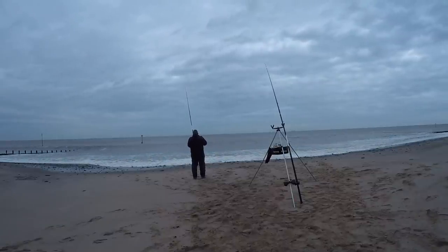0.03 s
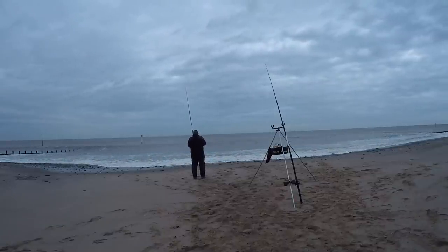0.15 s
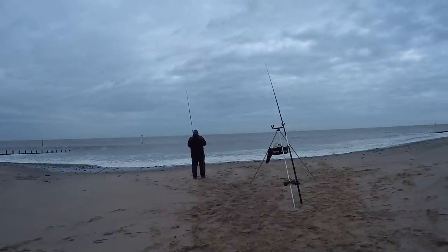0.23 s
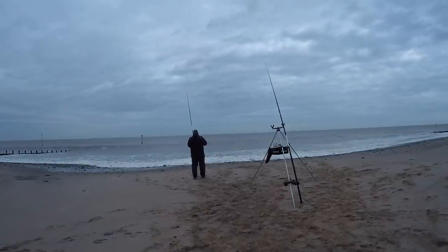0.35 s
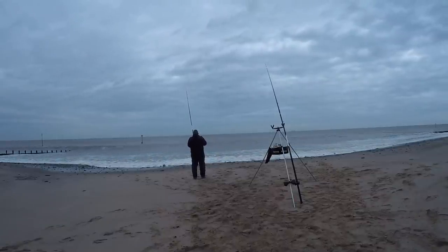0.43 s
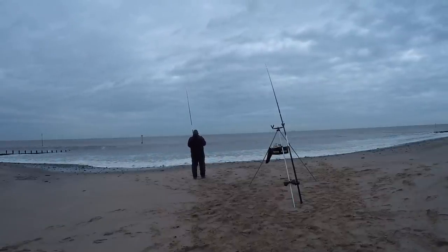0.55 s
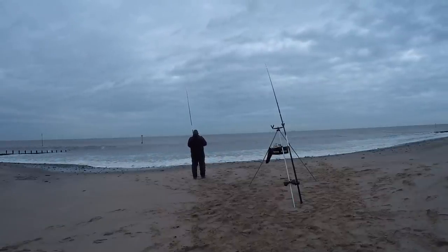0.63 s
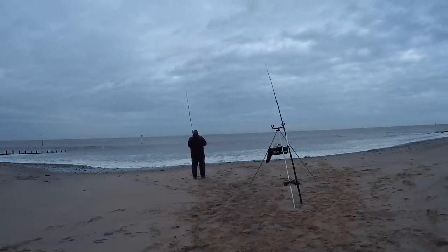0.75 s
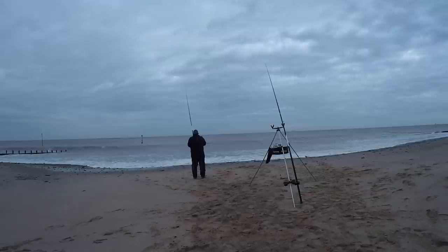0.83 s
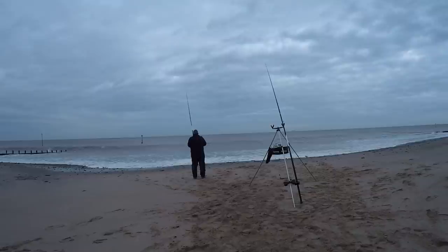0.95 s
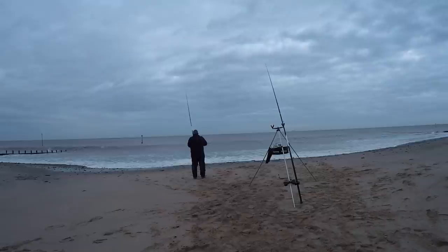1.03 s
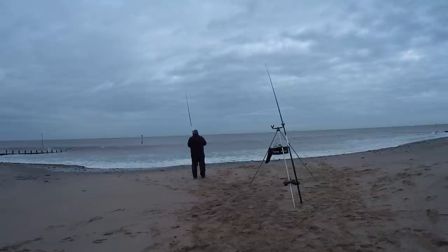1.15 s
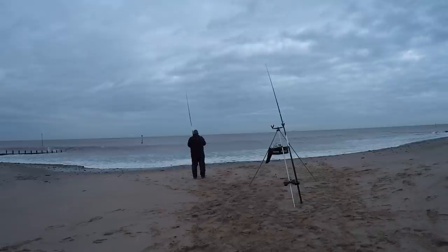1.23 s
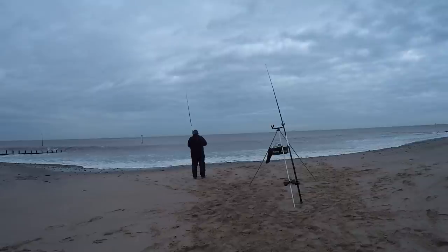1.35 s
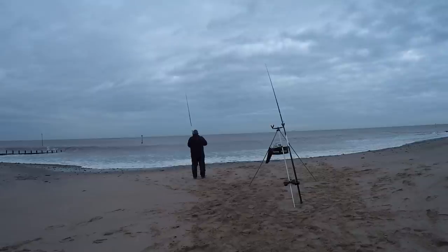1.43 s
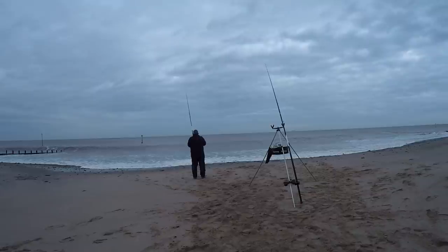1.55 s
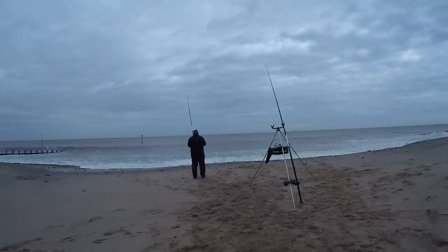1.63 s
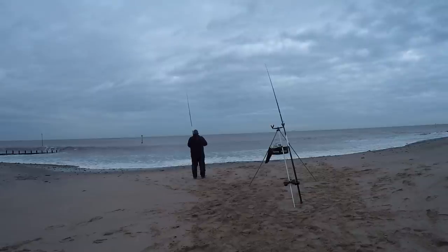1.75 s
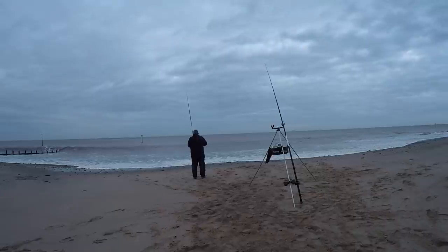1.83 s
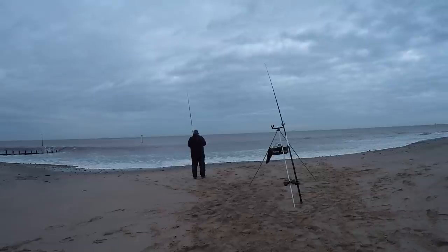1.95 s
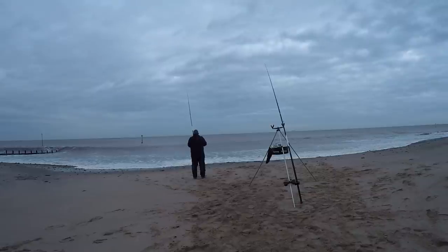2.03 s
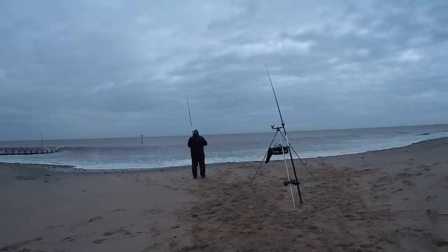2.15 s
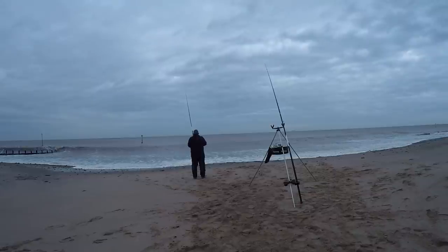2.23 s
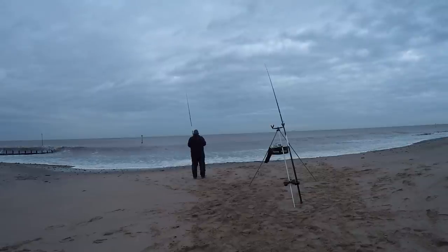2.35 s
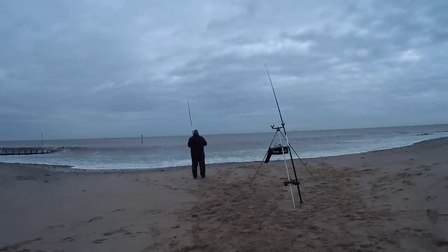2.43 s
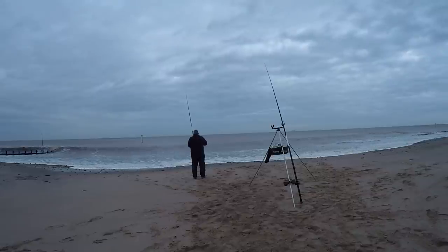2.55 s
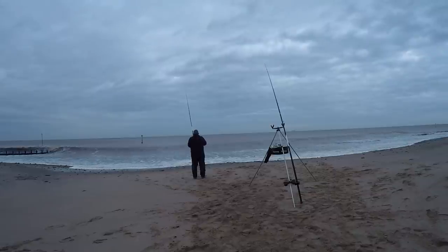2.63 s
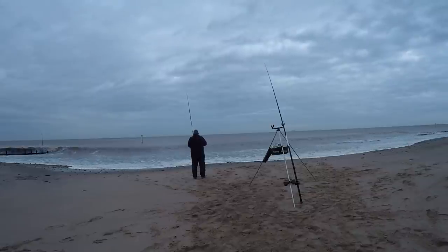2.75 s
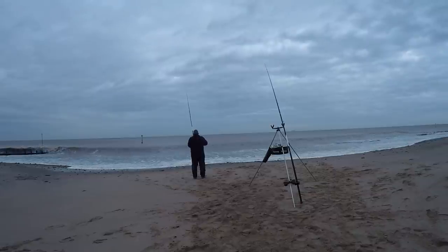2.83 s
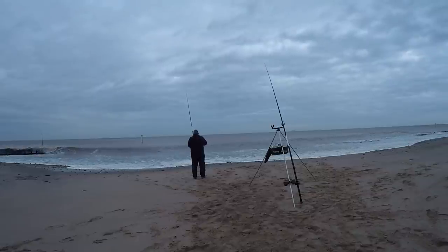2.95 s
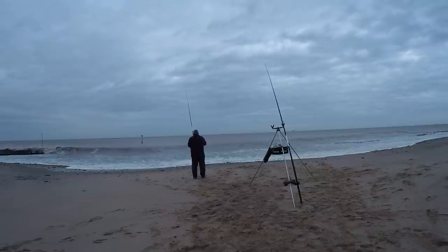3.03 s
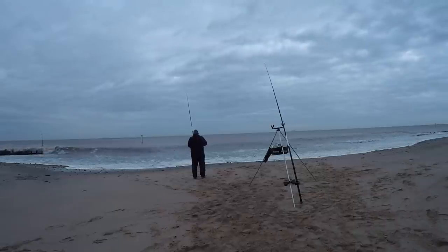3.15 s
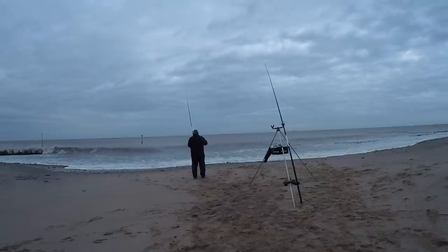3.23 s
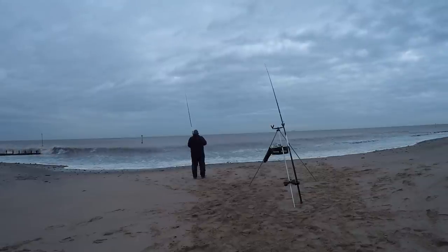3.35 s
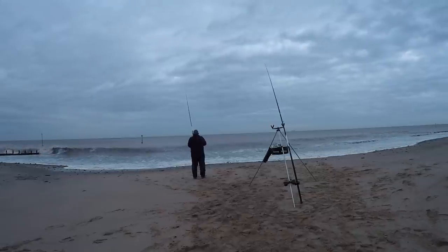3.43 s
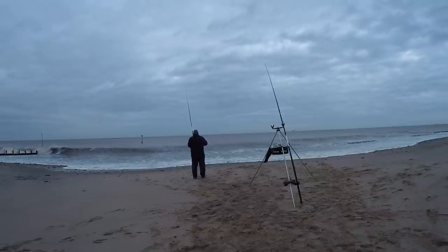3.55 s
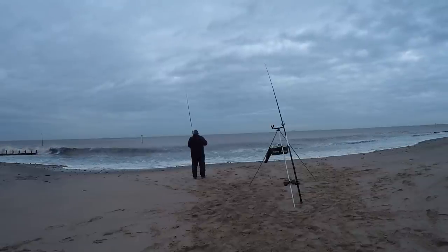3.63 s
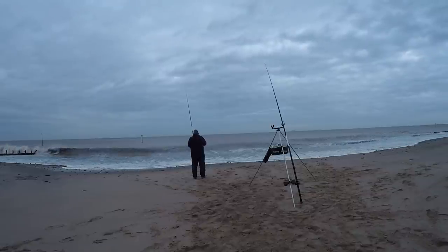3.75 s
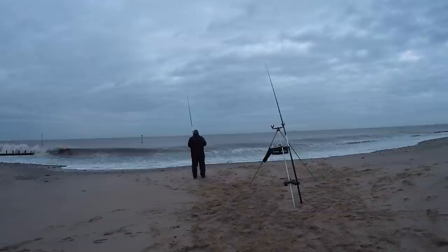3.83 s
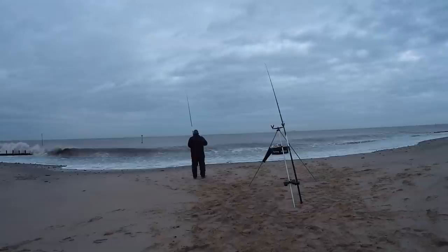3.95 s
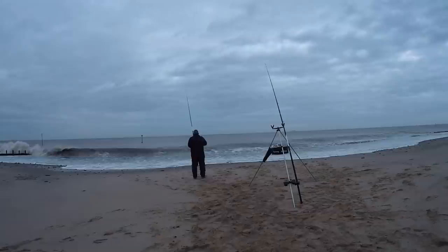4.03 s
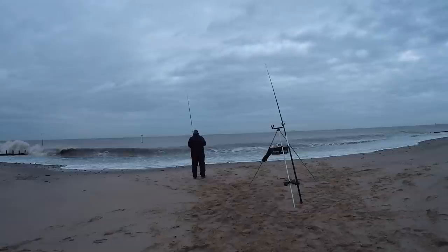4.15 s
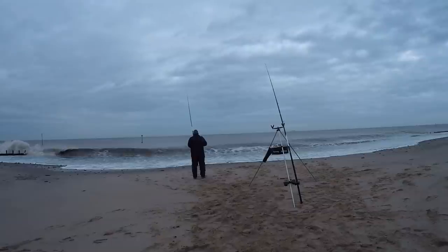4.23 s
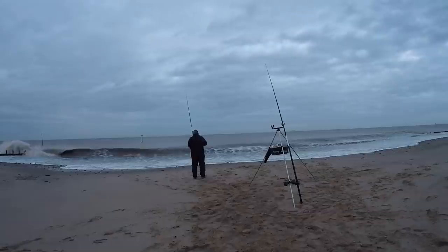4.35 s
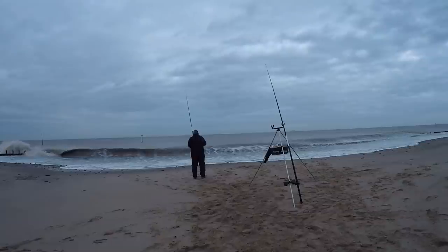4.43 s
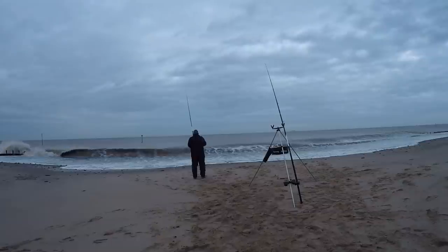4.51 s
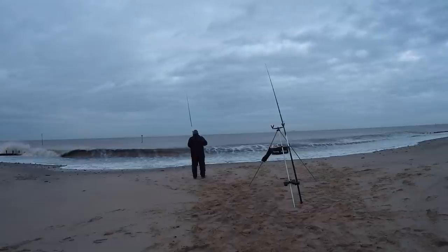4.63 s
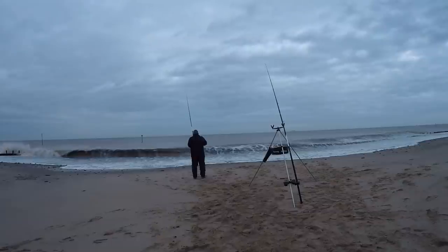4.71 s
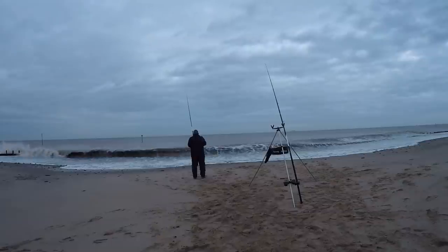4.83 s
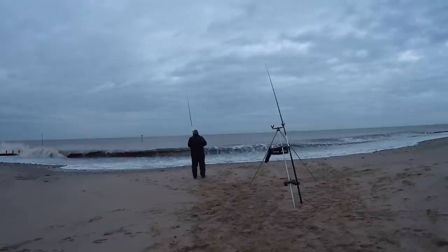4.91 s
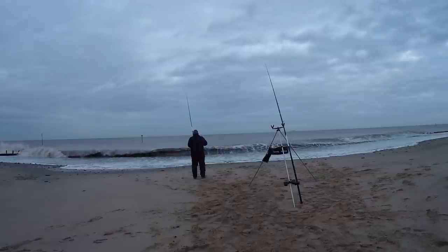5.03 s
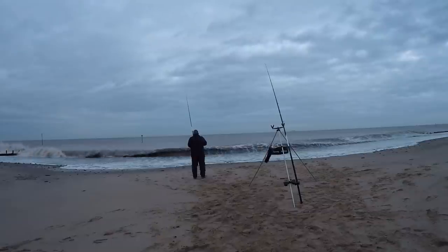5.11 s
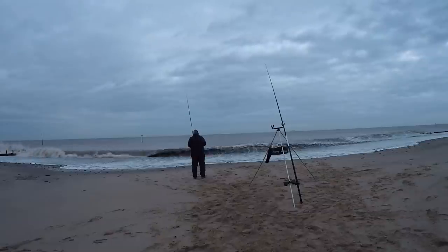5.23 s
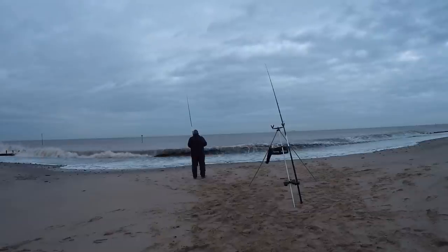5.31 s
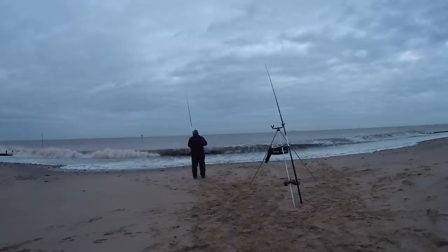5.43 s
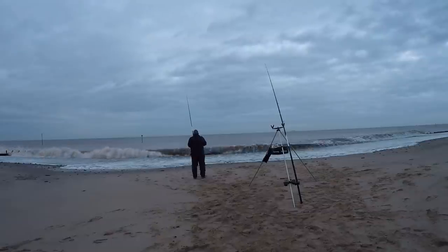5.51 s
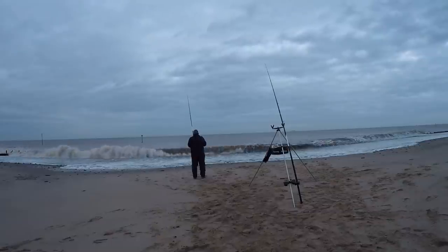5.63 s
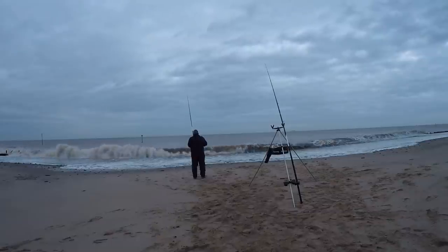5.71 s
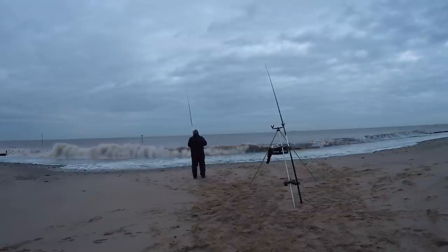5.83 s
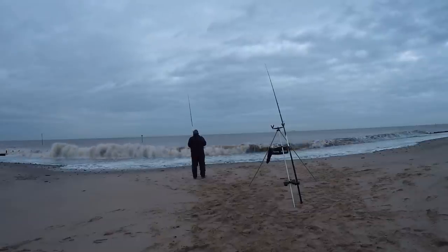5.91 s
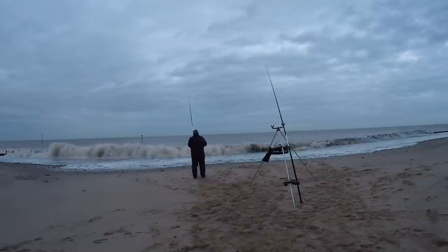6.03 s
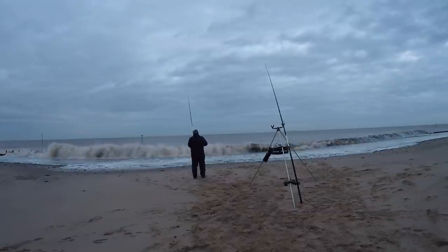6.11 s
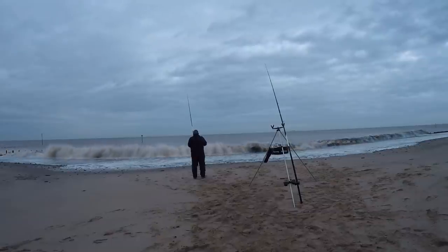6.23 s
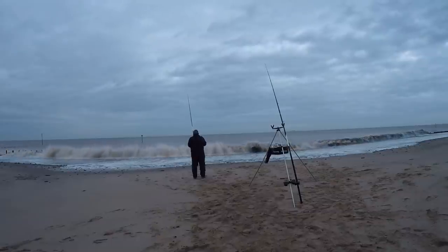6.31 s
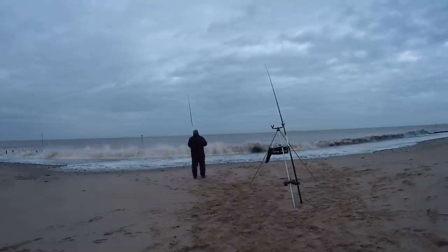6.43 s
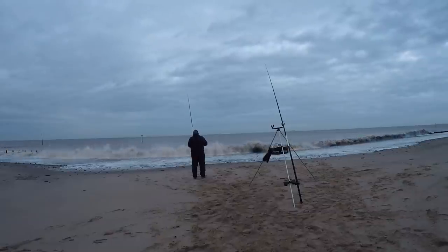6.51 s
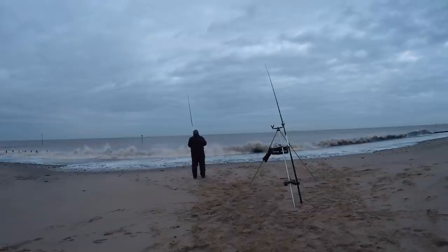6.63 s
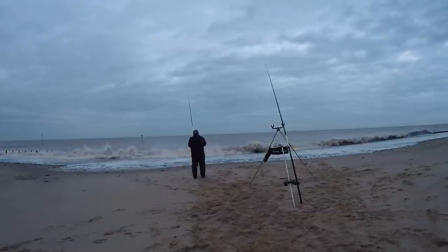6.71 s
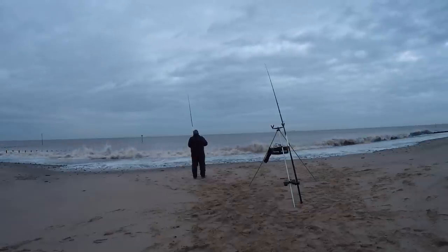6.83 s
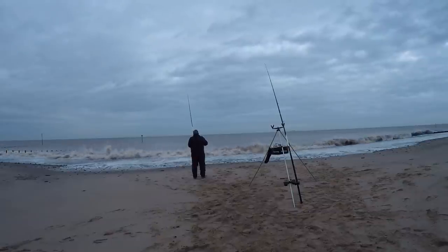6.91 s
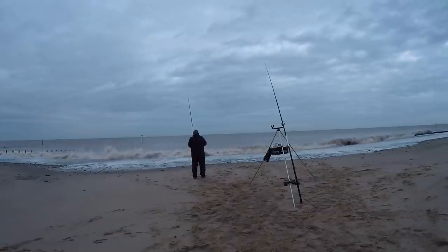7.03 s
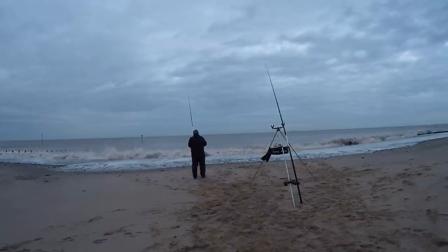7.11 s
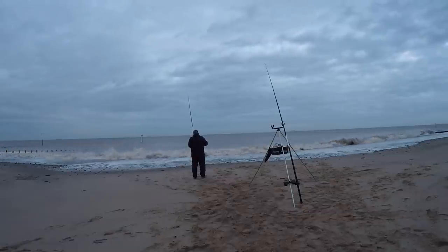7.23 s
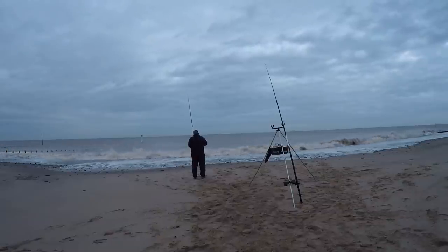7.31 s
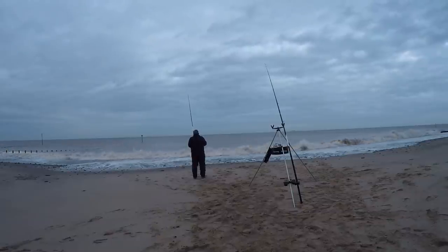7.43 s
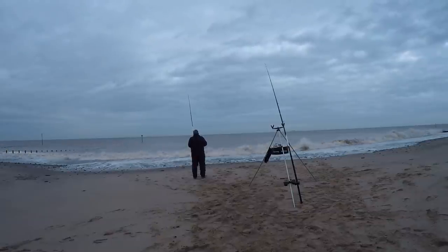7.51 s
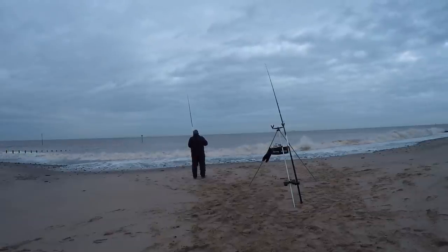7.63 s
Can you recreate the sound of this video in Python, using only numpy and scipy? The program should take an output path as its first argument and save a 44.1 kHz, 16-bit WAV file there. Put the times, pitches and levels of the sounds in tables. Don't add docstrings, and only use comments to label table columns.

```python
import sys
import numpy as np
from scipy import signal
from scipy.fft import rfft, irfft, next_fast_len
from scipy.io import wavfile
from scipy.ndimage import uniform_filter1d

SR = 44100
rng = np.random.default_rng(int(sys.argv[2]) if len(sys.argv) > 2 else 0)


def attenuation_scalar(level_db):
    decades = np.asarray(level_db, float) / 20
    return 10 ** decades


def bounce(signal):
    frames = np.transpose(np.atleast_2d(signal))
    limited = np.clip(frames, -1, 1)
    pcm = np.round(limited * 32767).astype(np.int16)
    wavfile.write(sys.argv[1], SR, pcm)


N = 338247
TIME = np.arange(N) / SR
TICKS = np.arange(0, N / SR + .01, 1 / 500)
SIZE = next_fast_len(N)
OCTAVES = np.log2(np.maximum(np.arange(SIZE // 2 + 1), 1) * SR / SIZE)


def along(table, hz):
    table_hz, value = np.transpose(table)
    return np.interp(np.log(hz), np.log(table_hz), value)


def curves(table):
    s, *columns = np.transpose(table)
    return [np.interp(TIME, s, column) for column in columns]


def smooth(x):
    return np.interp(TIME, TICKS, x)


def unit(x):
    return x / np.sqrt(np.mean(x ** 2))


def together(*levels_db):
    return 10 * np.log10(sum(attenuation_scalar(db) ** 2 for db in levels_db))


def walk(rate):
    knots = np.arange(0, N / SR + 2 / rate, 1 / rate)
    joined = np.interp(TICKS, knots, rng.standard_normal(len(knots)))
    return smooth(uniform_filter1d(joined, max(int(250 / rate), 1)))


def bursts(size_db):
    noise = rng.standard_normal((2, SIZE))
    return noise * attenuation_scalar(size_db * rng.exponential(size=(2, SIZE)))


# frequency in Hz, apart part against shared part in dB.
PORT_DIFFERENCE = [(10, -13), (100, -31), (700, -21.5), (1800, -27), (3000, -14.5), (4300, -14.5),
                   (6000, -7), (8000, -2), (9500, 0.5), (14000, 1)]


def cloud(colour, size_db, surge_db, surge_rate, flicker_db, flicker_rate,
          tilt_db=0., pivot_hz=1000, reach=np.inf, even=0):
    hz, step = 2 ** OCTAVES, 2 / 3
    shared_db = along(colour, hz)
    spectrum = rfft(bursts(size_db)) * attenuation_scalar([shared_db, shared_db + along(PORT_DIFFERENCE, hz)])
    out, surge = 0, surge_db * walk(surge_rate)
    for centre in np.arange(np.log2(colour[0][0]), np.log2(colour[-1][0]), step):
        band = np.clip(1 - abs(OCTAVES - centre) / step, 0, 1)
        part = irfft(spectrum * band, SIZE)[:, :N]
        if even:
            power = uniform_filter1d(part[0] ** 2, size=SR // 5) / np.mean(part[0] ** 2)
            part = part / (np.abs(power) + .01) ** (even / 2)
        height = centre - np.log2(pivot_hz)
        tilt = tilt_db * min(height, 2 * reach - height)
        out = out + part * attenuation_scalar(surge + flicker_db * walk(flicker_rate) + tilt)
    return out / np.sqrt(np.mean(out[0] ** 2))


# frequency in Hz, density in dB.
BOOM_COLOUR = [(40, -3), (80, 1.5), (140, 0.5), (280, -3), (500, -7), (800, -12), (1200, -29),
               (2000, -33.5)]
CHURN_COLOUR = [(300, -15), (600, 6.5), (1000, 10.5), (1400, 8), (1900, 4), (2400, -2), (3500, -8),
                (6000, -17)]
FOAM_COLOUR = [(1200, 3), (2400, 8), (3200, 5.5), (4200, 8), (5500, 5), (7500, -4.5), (9000, -6.5),
               (11000, -31)]
MIST_COLOUR = [(6000, -12), (8500, -3.5), (10000, 0), (11500, -3), (13000, -8.5), (14000, -10),
               (15000, -24), (17000, -34)]


def surf():
    boom_db, churn_db, foam_db, mist_db, fine_db = breaking()
    boom = attenuation_scalar(boom_db + 1.76) * cloud(BOOM_COLOUR, 1.36, 0.56, 9.1, 0.61, 5,
                                       tilt_db=0.23 * (boom_db + 24.5), pivot_hz=353, even=0.86)
    churn = attenuation_scalar(churn_db - 0.18) * cloud(CHURN_COLOUR, 2.15, 0.56, 20, 0.16, 2.3,
                                         tilt_db=0.17 * (foam_db - churn_db + 6.5), pivot_hz=1100)
    foam = attenuation_scalar(foam_db - 0.32) * cloud(FOAM_COLOUR, 1.53, 0.17, 22, 0.46, 17.0,
                                       tilt_db=fine_db, pivot_hz=4500)
    mist = attenuation_scalar(mist_db - 0.1) * cloud(MIST_COLOUR, 1.8, .5, 22, 0.72, 7,
                                      tilt_db=0.53 * (mist_db + 51), pivot_hz=10500)
    return boom + churn + foam + mist


# time in seconds, tumbling level in dB, tilt towards fine bubbles in dB per octave.
ROLL = [(0, -43.5, -2.5), (1.16, -43.5, -3.5), (1.95, -46, -3.5), (2.5, -43, -0.5), (2.9, -40.5, 0.5),
        (4.08, -39.5, 1.5), (4.3, -34.5, 0), (5.24, -32.5, -0.5), (5.33, -27.5, -3.5), (5.9, -26.5, 1.5),
        (6.45, -27, 1.5), (6.77, -26, 2), (6.92, -27.5, 0), (7.25, -25, 0.5), (7.67, -27, 0)]


def breaking():
    roll_db, fine_db = curves(ROLL)
    boom_db, churn_db, foam_db = topples()
    wash_foam_db, wash_mist_db = wash()
    roll_boom_db = -19.5 + 0.8071 * (roll_db + 26)
    roll_foam_db = -35.5 + 0.9 * (roll_db + 26)
    far_hiss_db, far_mist_db = -53.5, -66.5
    return (together(boom_db, roll_boom_db), together(churn_db, roll_db),
            together(foam_db, roll_foam_db, wash_foam_db, far_hiss_db),
            together(wash_mist_db, far_mist_db), fine_db)


# start in seconds, tumbling level in dB, air pocket level in dB,
# foam level in dB, decay time in seconds.
TOPPLES = [(1.2, -61, -35.5, -70, 0.53), (1.68, -59, -33, -72, 0.11), (2.745, -37, -31, -50, 0.022),
           (2.97, -39, -33, -58, .15), (3.06, -40.5, -29, -48, 0.11), (3.5, -38, -23.5, -58, 0.095),
           (3.58, -41, -24, -58, 0.098), (3.81, -50, -27, -59, .06), (4.2, -41, -32, -49, .05),
           (4.29, -31.5, -31, -48, 0.2), (4.72, -52, -24, -46, 0.058), (4.92, -42, -26, -47, 0.21),
           (5.265, -27.5, -23.5, -33, 0.091), (5.47, -29.5, -18, -36, 0.031), (5.69, -27, -29, -37, 0.031),
           (5.84, -31, -23, -42, 0.12), (6.3, -36, -23, -32, 0.16), (6.55, -32, -20, -36, 0.24),
           (7.07, -30, -19, -42, 0.083), (7.22, -28, -23, -49, 0.13), (7.3, -31, -24, -47, 0.046),
           (7.52, -45, -18.5, -49, 0.097)]


def topples():
    s, tumble_db, pocket_db, froth_db, dies = np.transpose(TOPPLES)
    t = np.maximum(TICKS[:, None] - s, 0)
    rise_s = 0.012
    shape = (1 - np.exp(-t / rise_s)) ** 2 * np.exp(-t / dies)
    shape = shape / shape.max(axis=0)
    powers = [smooth(shape @ attenuation_scalar(db) ** 2) for db in (pocket_db, tumble_db, froth_db)]
    return [10 * np.log10(power + 1e-12) for power in powers]


# time in seconds, mist level in dB.
WASH = [
    (4.0, -84),
    (4.8, -67.5),
    (5.25, -62.5),
    (5.51, -53),
    (5.74, -51),
    (5.9, -48.5),
    (6.8, -47.5),
    (7.05, -52),
    (7.67, -55),
]


def wash():
    mist_db, = curves(WASH)
    foam_db = -32.5 + 0.63 * (mist_db + 49)
    return foam_db, mist_db


# start in seconds, peak level in dB, centre frequency in Hz,
# rise time in seconds, fall time in seconds.
SLAPS = [
    (2.752, -38.5, 4100, .006, 0.01),
    (3.155, -45, 4500, .008, .015),
    (3.200, -57, 6000, .008, 0.013),
    (4.310, -40, 2000, .01, 0.044),
    (4.943, -33.5, 2500, .01, .03),
    (5.270, -53, 3000, .012, .03),
    (5.315, -36, 3170, 0.0069, 0.013),
    (5.495, -33, 3500, .01, .02),
]


def slaps():
    out = np.zeros((2, N))
    t = np.arange(int(.25 * SR)) / SR
    for s, db, hz, rise, fall in SLAPS:
        shape = (1 - np.exp(-t / rise)) * np.exp(-t / fall)
        sos = signal.butter(3, [hz / 12, min(hz * 1.45, 15000)], "band", fs=SR, output="sos")
        drops = unit(signal.sosfilt(sos, rng.standard_normal((2, len(t)))))
        start = int(s * SR)
        apart_gain = [[1], [attenuation_scalar(-14)]]
        out[:, start:start + len(t)] += attenuation_scalar(db) * shape / shape.max() * drops * apart_gain
    return out


# time in seconds, bearing from -1 to 1, width of the noisy front in dB.
CREST = [(0, -0.41, -4), (1.5, -0.25, -3), (2.4, 0.048, -3), (2.75, 0.74, -1), (3.5, 0.56, 0),
         (4.2, 0.99, -2), (5.2, 0.58, 0), (5.35, 0.42, -6), (5.8, 0.16, -5.5), (6.3, 0.34, -3),
         (6.85, 0.13, -1.5), (7.05, -0.078, 0.5), (7.67, -0.044, -1)]
# frequency in Hz, half the phase between ports in radians, gain in dB.
FLANK = [(480, .02, -1), (2000, 0.097, 1.5), (3500, 0.13, 2.5), (4300, 0.23, -0.5), (5360, 0.65, -3),
         (6400, .55, 4.5), (7300, 0.4, 7), (8500, 0.67, 4), (9300, 0.89, 3), (11600, 1.28, 11),
         (14000, 1.1, 2)]


def ports(shared, apart):
    bearing, width_db = curves(CREST)
    hz, phase, db = np.transpose(FLANK)
    gain = attenuation_scalar(np.interp(OCTAVES, np.log2(hz), db))
    turn = gain * np.exp(-1j * np.interp(OCTAVES, np.log2(hz), phase))
    padded = np.pad(shared, (0, SIZE - N), "linear_ramp", end_values=shared[0])
    kept, moved = irfft(rfft(padded) * np.array([turn.real, 1j * turn.imag]), SIZE)[:, :N]
    return np.array([shared + abs(bearing) * (kept - shared), attenuation_scalar(width_db) * apart + bearing * moved])


# time in seconds, level in dB, share of small eddies in dB.
GUST = [(0, -27.5, -15), (.5, -26, -2.5), (1.1, -24.5, -2), (1.7, -23, -1.5), (2.45, -23.5, -5.5),
        (2.6, -23.5, -4), (3.0, -16, -3), (3.35, -17, 4.5), (3.75, -15, 5), (4.1, -16.5, -5.5),
        (4.5, -15.5, -4), (5.1, -16, -5), (5.6, -16.5, -10), (6.4, -18.5, 0.5), (7.0, -18, 1),
        (7.67, -16.5, -10)]
# centre in seconds, extra level in dB, extra small eddies in dB, length in seconds.
BUFFETS = [(.33, 2.5, -17, .05), (0.613, 8, -5, 0.069), (0.787, 4.5, -11, 0.024), (1.023, -3, 2, .05),
           (1.26, -7, 10, .05), (1.966, 0, 10, 0.031), (2.48, -5.5, 4, .04), (2.633, 2, -1, .05),
           (2.77, -5, 2, 0.034), (3.045, 0, 6, 0.062), (3.19, -2.5, -4, .05), (3.425, 3, -7, 0.025),
           (3.57, -6.5, 19, 0.048), (4.047, 1, -11, 0.037), (4.166, 5, -6, 0.022), (4.285, -5, 6, .04),
           (4.474, -1.5, 9, .05), (4.975, 7.5, -14, 0.027), (5.06, -8.5, -6, 0.05),
           (5.296, 5.5, -13, 0.043), (5.722, 2, 14.5, 0.046), (6.032, 8, -16, 0.052), (6.55, 0.5, 1, .06),
           (6.72, 1.5, 2, .05), (7.0, -4.5, 5, 0.045), (7.106, 4, -6, 0.057), (7.346, 0, 13, 0.045),
           (7.46, 2, -8.5, .07)]
# frequency in Hz, density in dB.
EDDY_COLOUR = [(6, -14), (14, 3), (30, 0.5), (60, -3.5), (100, -11.5), (200, -20), (400, -25)]


def wind():
    gust_db, small_db = curves(GUST)
    s, db, small, length = np.transpose(BUFFETS)
    passing = np.exp(-.5 * ((TICKS[:, None] - s) / length) ** 2)
    gust_db = gust_db + smooth(passing @ db)
    small_db = small_db + smooth(passing @ small)
    tilt_db = np.clip(0.41 * (small_db + 2.5), -5, 5)
    return attenuation_scalar(gust_db + 0.5) * cloud(EDDY_COLOUR, 0.92, 0.48, 7.8, 0.45, 14, tilt_db=tilt_db,
                                      pivot_hz=26, reach=1.75, even=0.61)


# start in seconds, length in seconds, start frequency in Hz,
# end frequency in Hz, level in dB.
PEEPS = [
    (.297, .012, 4400, 4650, -44),
    (.319, .025, 4450, 3600, -46),
    (.352, .026, 3050, 3800, -48),
    (.385, .012, 3400, 3450, -50),
]


def bird():
    out = np.zeros(N)
    for s, length, start_hz, end_hz, db in PEEPS:
        part = np.clip((TIME - s) / length, 0, 1)
        phase = 2 * np.pi * np.cumsum(start_hz + (end_hz - start_hz) * part) / SR
        out += attenuation_scalar(db) * np.sin(np.pi * part) ** .5 * np.sin(phase)
    return out


# frequency in Hz, density in dB.
HISS_COLOUR = [(2000, -3), (6000, 0), (10000, -13), (13500, -9.5), (15500, -15)]


def self_noise():
    hz = np.maximum(np.arange(N // 2 + 1) * SR / N, 1)
    hiss = irfft(rfft(rng.standard_normal((2, N))) * attenuation_scalar(along(HISS_COLOUR, hz)), N)
    return attenuation_scalar(-54.5) * unit(hiss)


def leaning(sound, lean_db):
    shared, apart = sound
    bass = signal.sosfilt(signal.butter(1, 1800, fs=SR, output="sos"), shared)
    return np.array([shared, apart + bass * (attenuation_scalar(lean_db) - 1) / (attenuation_scalar(lean_db) + 1)])


# time in seconds, wind left minus right in dB, water left minus right in dB.
LEAN = [
    (0, -1.5, -2),
    (3.0, -1.5, -2),
    (5.4, -1.5, -1.2),
    (7.67, 0.5, -1.8),
]


def scene():
    wind_db, water_db = curves(LEAN)
    water = ports(*(surf() + slaps()))
    shared, apart = leaning(wind(), wind_db) + leaning(water, water_db)
    return np.array([shared + apart, shared - apart]) + bird() + self_noise()


def roll_off(x):
    return signal.sosfilt(signal.butter(12, 15150, fs=SR, output="sos"), x)


def record(dry):
    mix = np.tanh(0.94 * dry) / 0.84
    return roll_off(mix)


dry = scene()
out = record(dry)
bounce(out)
```